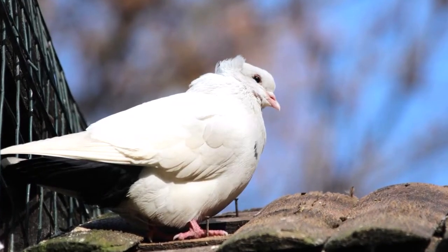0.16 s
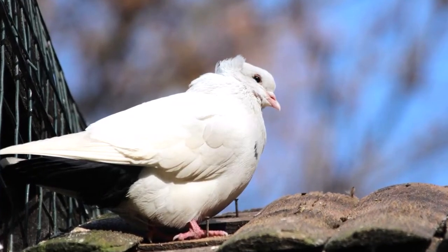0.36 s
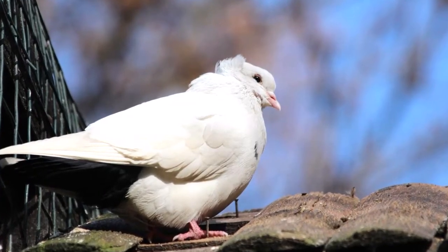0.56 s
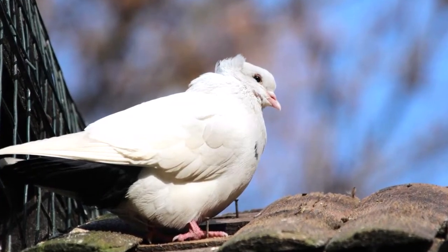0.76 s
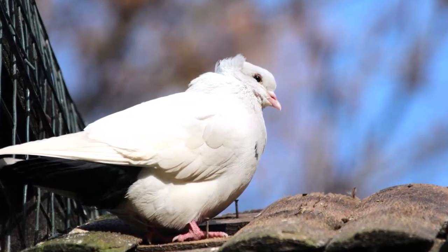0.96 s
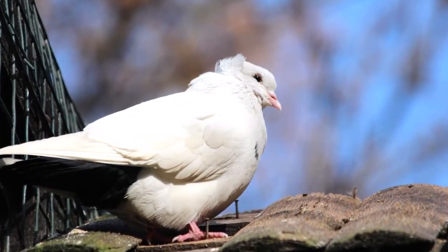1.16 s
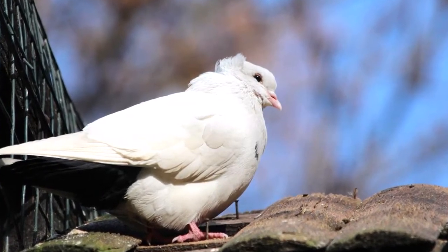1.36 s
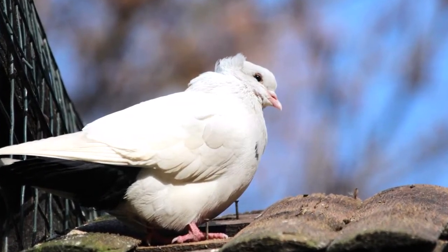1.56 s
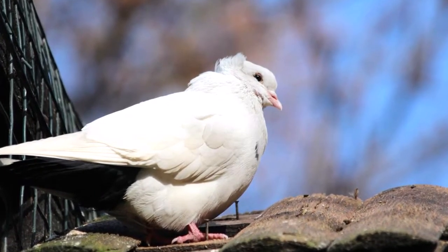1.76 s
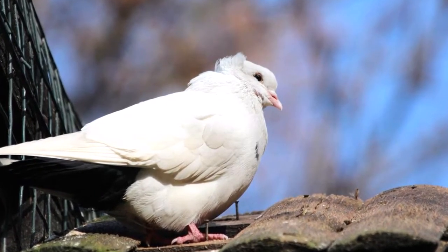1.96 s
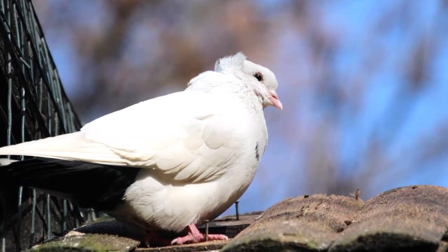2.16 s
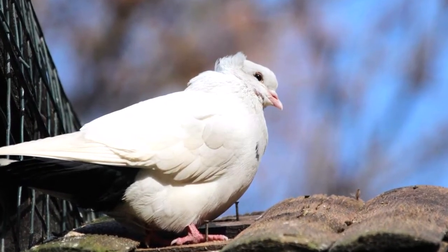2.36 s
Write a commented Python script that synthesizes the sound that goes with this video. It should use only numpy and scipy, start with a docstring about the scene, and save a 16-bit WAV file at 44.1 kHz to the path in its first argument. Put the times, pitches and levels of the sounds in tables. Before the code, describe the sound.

A pigeon coos close to the microphone outdoors, two low throbbing phrases quickening into rolling trills that fall at the end, then a softer long coo; faint claw ticks, distant cooing murmur and light air noise.

```python
"""Over a murmuring distant flock and steady air noise, a close pigeon coos: single throbs speed up
into a rolling trill with a falling end, twice, then a long coo drops quickly to a nearly level pitch.
Coos are bell-shaped or held tones with weak overtones; the flock is many overlapping throbs.
Claws tick on a hard surface as short ringing noise bursts. A dull recorder adds grit, a broadband noise
that rises and falls with coo loudness, limits the band, and adds faint mirror tones and squared sound."""
import sys
import numpy as np
from scipy import signal
from scipy.fft import rfft, irfft
from scipy.io import wavfile
from scipy.ndimage import uniform_filter1d

SR = 44100
rng = np.random.default_rng(int(sys.argv[2]) if len(sys.argv) > 2 else 0)


def dump(signal):
    """Clip the signal to [-1, 1] and save it as 16-bit WAV at the path in sys.argv[1]."""
    limited = np.clip(np.atleast_2d(signal).T, -1, 1)
    pcm = np.round(limited * 32767).astype(np.int16)
    wavfile.write(sys.argv[1], SR, pcm)


N = 110250  # 2.5 s

# Air noise spectrum. Each row: frequency in Hz, relative density in dB per Hz.
AIR_SPECTRUM = [(30, -47), (185, -26.5), (400, -1), (800, -10.5), (1400, -18.5), (2400, -17), (3400, -26.5),
                (4500, -39.5), (14000, -60.5)]
# Flock loudness over time. Each row: time in seconds, rms level in dB.
FLOCK_LEVELS = [(0, -27), (.07, -50), (.28, -41.5), (.74, -35), (.77, -43.5), (.9, -39), (1.06, -44.5),
                (1.3, -45), (1.6, -30), (1.821, -43), (2.3, -42.5), (2.5, -41.5)]
# Short coo throbs. Each row: centre in seconds, peak level in dB, pitch in Hz, width in ms.
COO_THROBS = [(0.026, -23.5, 582.3, 16), (0.15, -26, 388, 14), (0.217, -17.5, 334, 6),
              (0.225, -17.5, 327.4, 6), (0.302, -10.5, 334, 7.4), (0.371, -9.5, 337.4, 8.83),
              (0.438, -5.5, 353.5, 11.5), (0.48, -6.5, 366.3, 8.3), (0.499, -6.5, 385.3, 8.3),
              (0.519, -7.5, 369.6, 8.6), (0.539, -8, 378.2, 9.3), (0.56, -9, 363, 8.2),
              (0.582, -8.5, 376.3, 9.8), (0.603, -8, 365, 8.3), (0.623, -7.5, 362.8, 9.9),
              (0.646, -9, 337.7, 17), (0.669, -10, 314.3, 10.5), (0.685, -14.5, 305, 9.04),
              (0.698, -22, 284, 6), (0.711, -24, 379, 9), (0.727, -22, 403, 7), (0.743, -28, 421.5, 11),
              (0.825, -31.5, 401, 18), (0.92, -33.5, 342.5, 18), (0.983, -29.5, 398, 7.14),
              (1.02, -32.5, 420, 5.83), (1.104, -25.5, 403, 7), (1.149, -24, 393, 5.5),
              (1.247, -13.5, 333.4, 11), (1.353, -12, 401.2, 7.3), (1.374, -12, 405, 7.3),
              (1.395, -14, 399.5, 7.3), (1.403, -12, 406, 4.7), (1.42, -17.5, 395.2, 8.6),
              (1.452, -10, 383, 7.3), (1.47, -14.5, 410, 7.8), (1.488, -10.5, 391, 8.3),
              (1.504, -13, 393, 7.7), (1.524, -15.5, 399, 8.6), (1.543, -16.5, 393, 7.3),
              (1.555, -13.5, 385, 7.3), (1.573, -16, 388, 10.6), (1.586, -13, 403.6, 7.3),
              (1.604, -11, 375.8, 11.7), (1.624, -11.5, 377, 6.34), (1.642, -16, 382.7, 10.6),
              (1.66, -14, 371, 12.9), (1.675, -14, 357, 9.5), (1.766, -14.5, 385.7, 9.3),
              (2.229, -19.5, 373, 6), (2.26, -22, 473, 6.3), (2.4, -23.5, 388, 8.5),
              (2.467, -28.5, 352, 4.26), (2.476, -23.5, 315, 6.54)]
# Overtones of every coo. Each row: multiple of the pitch, level relative to the fundamental in dB.
COO_OVERTONES = [(2, -24), (3, -30)]
# Held notes. Each row: time in seconds, pitch in Hz, rms level in dB.
FIRST_FALL = [(.688, 285, -24.5), (.72, 236, -34.5), (.755, 204, -49.5)]
SECOND_FALL = [(1.672, 361, -26), (1.687, 323, -16.5), (1.699, 305.6, -24), (1.742, 282.4, -33.5),
               (1.749, 274, -50.5)]
LONG_NOTE = [(1.936, 519, -32), (1.945, 457.8, -24.5), (1.96, 361.8, -25.5), (2.078, 334.7, -26.5),
             (2.219, 323.5, -28.5), (2.246, 324.4, -28), (2.272, 268, -40.5), (2.3, 252, -60.5)]
SOFT_NOTE = [(.305, 356.4, -38.5), (0.316, 349, -30), (0.358, 337.3, -30.5), (.43, 337.2, -32),
             (.465, 343, -24), (.475, 348, -47)]
HIGH_NOTE = [(2.165, 504, -50.5), (2.18, 497, -33), (2.215, 475, -33.5), (2.242, 483.6, -43.5),
             (2.259, 504, -39), (2.281, 520, -26), (2.282, 500, -46.5)]
FAINT_NOTE = [(1.97, 528, -42.5), (2.0, 533, -38.5), (2.08, 481, -47)]
SMALL_BIRD_NOTE = [(0.559, 3350, -52), (.592, 3290, -50.5), (0.598, 3240, -62)]
# Spectrum of the recorder grit. Each row: frequency in Hz, relative density in dB per Hz.
GRIT_SPECTRUM = [(290, -41.5), (520, -6.5), (1000, -12.5), (2000, -16.5), (3250, -24), (4300, -36.5),
                 (5300, -48.5), (14000, -51)]
# Claw ticks and scrapes. Each row: start in seconds, level in dB, ring in Hz, decay time in ms.
CLAW_TICKS = [(0.6, -33, 2380, 2), (.978, -35, 2270, 2.6), (1.669, -36.5, 2230, 12),
              (1.684, -26, 1085, 3.1), (1.7498, -32.5, 2420, 4.5), (1.9741, -21.5, 1500, 1.73),
              (1.9747, -25, 2350, 2.4), (1.9813, -26, 1660, 1.3), (1.984, -43.5, 3120, 24),
              (1.983, -51.5, 4020, 21), (2.258, -39.5, 2710, 6.2), (2.454, -40, 2980, 3.5),
              (2.466, -37.5, 2250, 4.9), (2.256, -34.5, 670, 18)]
# Mirror tones of the recorder. Each row: mirror frequency in Hz, level in dB.
MIRROR_TONES = [(6440, -53), (9140, -64), (13000, -65.5)]

AIR_DB, AIR_DRIFT_DB = -48, 0.8

FLOCK_VOICES, FLOCK_THROBS_PER_S = 24, 700  # rate is for all voices together
FLOCK_HZ, FLOCK_LOG_SPREAD = 407.4, 0.1801
FLOCK_WIDTH_MS, FLOCK_SIZES_DB = 8.3, 1.7  # before random scaling

THROB_STEEPNESS, THROB_SAG = 2.49, 0.026  # sag: share of pitch lost per throb width
ROUGH_FROM_DB, ROUGH_PER_DB = -15, 0.055  # quieter throbs flutter more
WAVER_SHARE, WAVER_DB = 0.012, 1  # held pitch and level

GRIT_DB, GRIT_DRIFT_DB, GRIT_POWER = -26.5, 1.5, 0.87  # grit follows coo strength to this power
GRIT_LEAD_S = 0.0018  # grit runs slightly ahead of the coo
GRIT_SMEAR_S, GRIT_LINGER_SHARE = 0.015, 0.45

TICK_BASE_HZ, TICK_SPREAD_HZ_MS = 200, 3200  # brief ticks ring broader than long scrapes
TICK_ATTACK_S, TICK_TOP_HZ = 0.0011, 4600

ECHO_T60_S, ECHO_DELAY_S, ECHO_DB = 0.13, 0.004, -16
BASS_CUT_HZ = 149

LOPSIDED_SHARE = 0.007  # squared sound: faint bass thump under loud throbs
BAND_EDGE_HZ = 14300


def gain_of(db):
    """Convert decibels to amplitude."""
    return 10 ** (np.asarray(db) / 20)


def evened(x):
    """Scale to unit rms."""
    return x / np.sqrt(np.mean(x ** 2) + 1e-20)


def add(mix, start_s, sound):
    """Mix a sound in at a time, cropping at the end."""
    part = mix[max(round(start_s * SR), 0):][:len(sound)]
    part += sound[:len(part)]


def noise(points):
    """Unit-rms noise shaped by a spectrum table, interpolated over log frequency."""
    table_hz, table_db = np.transpose(points)
    hz = np.fft.rfftfreq(N, 1 / SR)
    db = np.interp(np.log(hz + 1), np.log(table_hz + 1), table_db)
    return evened(irfft(rfft(rng.standard_normal(N)) * gain_of(db), N))


def wander(n, span_s):
    """Unit-rms random drift: white noise smoothed twice."""
    size = max(round(span_s * SR), 1)
    once = uniform_filter1d(rng.standard_normal(n), size)
    return evened(uniform_filter1d(once, size))


def air():
    """Spectrally shaped noise whose level drifts slightly."""
    return gain_of(AIR_DB + AIR_DRIFT_DB * wander(N, 0.02)) * noise(AIR_SPECTRUM)


def voice(hz, strength):
    """Nearly pure tone: integrated pitch gives phase, weak overtones share it."""
    phase = 2 * np.pi * (np.cumsum(hz) / SR + rng.random())
    overtones = sum(gain_of(db) * np.cos(k * phase) for k, db in COO_OVERTONES)
    return strength * (np.sin(phase) + overtones)


def throb(peak_db, hz, width_ms):
    """Bell-shaped swell of sagging tone, three widths long, fluttering if quiet."""
    u = np.arange(-1.5, 1.5, 1000 / (width_ms * SR))  # time in widths
    rough = np.clip((ROUGH_FROM_DB - peak_db) * ROUGH_PER_DB, 0, 0.45)
    flutter = np.sqrt(1 - rough ** 2) + rough * wander(4000, 0.0038)[:len(u)]
    bell = 0.6 ** (abs(2 * u) ** THROB_STEEPNESS)
    return voice(hz * (1 - THROB_SAG * u), flutter * gain_of(peak_db) * bell)


def flock():
    """Randomly timed, overlapping throbs from voices of scattered pitch and width."""
    out = np.zeros(N)
    for spread in np.linspace(-1.7, 1.7, FLOCK_VOICES):
        starts = rng.random(N) < FLOCK_THROBS_PER_S / FLOCK_VOICES / SR
        sizes_db = FLOCK_SIZES_DB * np.minimum(rng.exponential(1, N), 3)
        hz = FLOCK_HZ * np.exp(FLOCK_LOG_SPREAD * spread)
        shape = throb(0, hz, FLOCK_WIDTH_MS * rng.uniform(0.59, 1.58))
        out += signal.oaconvolve(starts * gain_of(sizes_db), shape)[:N]
    s, db = np.transpose(FLOCK_LEVELS)
    return evened(out) * gain_of(np.interp(np.arange(N) / SR, s, db))


def held(curve):
    """Tone following a pitch and level curve with small random waver."""
    s, hz, db = np.transpose(curve)
    t = np.arange(s[0], s[-1], 1 / SR)
    fade = np.minimum(np.minimum(t - s[0], s[-1] - t) / 0.0067, 1)
    pitch_hz = np.interp(t, s, hz) * (1 + WAVER_SHARE * wander(len(t), 0.0073))
    level_db = np.interp(t, s, db) + WAVER_DB * wander(len(t), 0.0043)
    return voice(pitch_hz, np.sqrt(2) * fade * gain_of(level_db))  # sqrt(2): rms to peak


def pigeons():
    """Sum of bell-shaped throbs and held notes."""
    out = np.zeros(N)
    for centre_s, peak_db, hz, width_ms in COO_THROBS:
        add(out, centre_s - 1.5 * width_ms / 1000, throb(peak_db, hz, width_ms))
    for curve in (FIRST_FALL, SECOND_FALL, LONG_NOTE, SOFT_NOTE, HIGH_NOTE, FAINT_NOTE, SMALL_BIRD_NOTE):
        add(out, curve[0][0], held(curve))
    return out


def recorder_grit(coos):
    """Broadband noise that rises and falls with coo loudness, slightly early, part lingering."""
    quick = uniform_filter1d(abs(coos), 100)
    quick = np.roll(quick, -round(GRIT_LEAD_S * SR))
    keep = np.exp(-1 / (GRIT_SMEAR_S * SR))
    linger = signal.lfilter([1 - keep], [1, -keep], quick)
    strength = abs(quick + GRIT_LINGER_SHARE * linger) ** GRIT_POWER
    level_db = GRIT_DB + GRIT_DRIFT_DB * wander(N, 0.003)
    return gain_of(level_db) * strength * noise(GRIT_SPECTRUM)


def ticks():
    """Decaying noise bursts through a doubled broad resonance, then low-passed."""
    out = np.zeros(N)
    for start_s, db, hz, decay_ms in CLAW_TICKS:
        t = np.arange(0, 4 * decay_ms / 1000, 1 / SR)
        radius = np.exp(-np.pi * (TICK_BASE_HZ + TICK_SPREAD_HZ_MS / decay_ms) / SR)
        poles = [1, -2 * radius * np.cos(2 * np.pi * hz / SR), radius * radius]
        ring = signal.lfilter([1, 0, -1], np.convolve(poles, poles), rng.standard_normal(6000))
        shape = np.minimum(t / TICK_ATTACK_S, 1) * np.exp(-t * 1000 / decay_ms)
        burst = evened(shape * np.resize(ring, len(t)))
        add(out, start_s, gain_of(db) * np.sqrt(np.mean(shape ** 2)) * burst)
    low_pass = signal.butter(8, TICK_TOP_HZ, fs=SR, output="sos")
    return signal.sosfilt(low_pass, out)


def echo(near):
    """Short echo: convolution with decaying noise of unit energy."""
    t = np.arange(0, 0.3, 1 / SR)
    tail = rng.standard_normal(len(t)) * gain_of(-60 * t / ECHO_T60_S) * (t > ECHO_DELAY_S)
    return gain_of(ECHO_DB) * signal.fftconvolve(near, tail / np.linalg.norm(tail))[:N]


def scene():
    """Near sounds with grit, echo and flock, bass cut, plus air."""
    coos = pigeons()
    near = coos + recorder_grit(coos) + ticks()
    mix = near + echo(near) + flock()
    high_pass = signal.butter(3, BASS_CUT_HZ, "high", fs=SR, output="sos")
    return (signal.sosfilt(high_pass, mix) + air())[None]


def record(dry):
    """Recorder: squared sound, copies mirrored about high frequencies, then a band limit."""
    t = np.arange(N) / SR
    lopsided = dry + LOPSIDED_SHARE * (dry ** 2 - np.mean(dry ** 2))
    mirrors = sum(gain_of(db) * np.cos(2 * np.pi * hz * t) for hz, db in MIRROR_TONES)
    low_pass = signal.firwin(511, BAND_EDGE_HZ, window=("kaiser", 9), fs=SR)
    return signal.oaconvolve(lopsided * (1 + mirrors), low_pass[None], "same")


dry = scene()
out = record(dry)
dump(out)
```